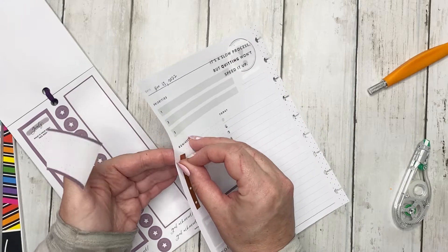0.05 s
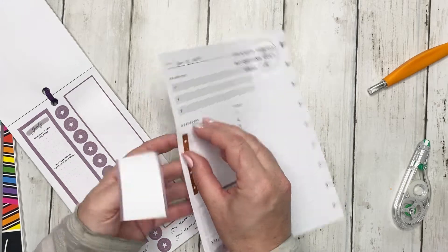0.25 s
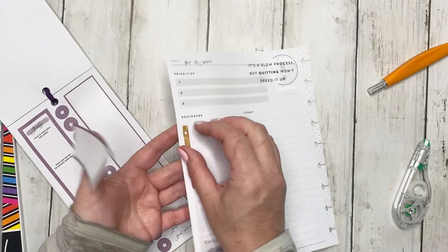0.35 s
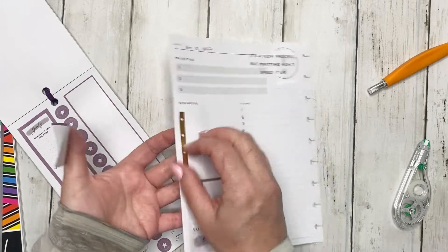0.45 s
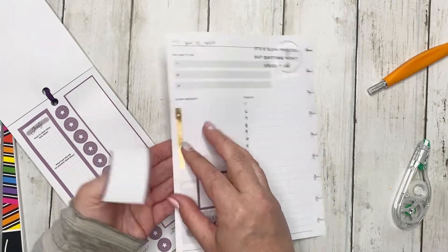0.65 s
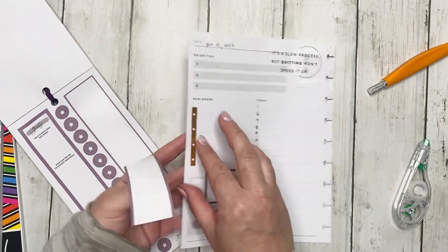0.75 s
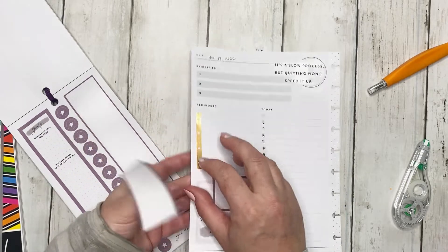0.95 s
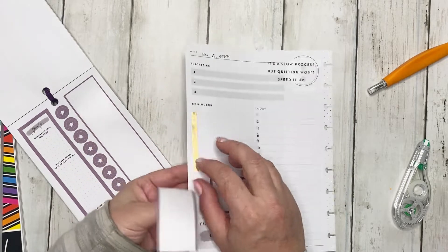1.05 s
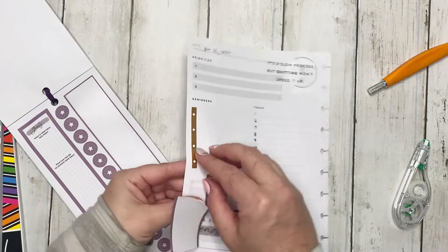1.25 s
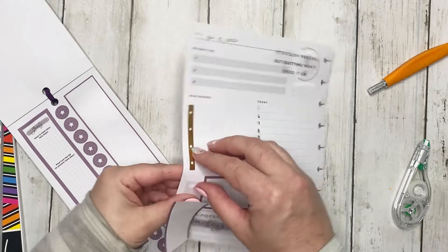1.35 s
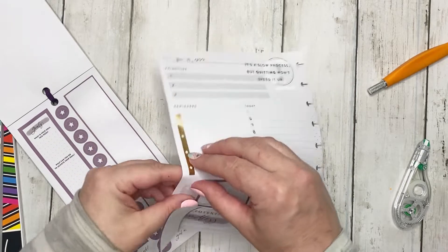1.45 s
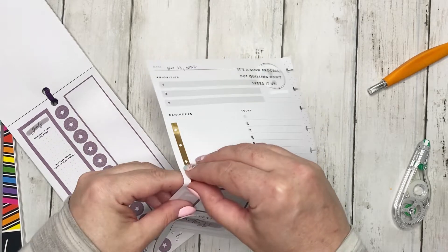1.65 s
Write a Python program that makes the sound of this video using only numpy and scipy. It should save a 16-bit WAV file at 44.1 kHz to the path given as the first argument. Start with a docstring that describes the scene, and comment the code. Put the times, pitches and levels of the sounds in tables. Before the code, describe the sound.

Paper rustling and popping as a sheet is handled, with hollow clicks, soft hiss and crackles

```python
"""A small quiet room, close microphone: a planner page is slid and lifted on a desk while a strip
of sticker is pressed along its edge. Shaped noise makes the page's hiss, scrape and rustle, and
bands of noise, some gliding, make the fingertip rubs and swishes. Short bursts of tone make the soft
hollow pops of the buckling sheet and some of their close echoes; fading tones colour them.
Short bursts of bright noise make crackles as the adhesive lets go, and sharpen one loud pop."""
import sys
import numpy as np
from scipy import signal
from scipy.fft import rfft, irfft
from scipy.io import wavfile
from scipy.ndimage import uniform_filter1d

SR = 44100
rng = np.random.default_rng(int(sys.argv[2]) if len(sys.argv) > 2 else 0)


def generate_wav(sig):
    """Save sig (samples, or channels by samples) to the path in sys.argv[1] as 16-bit PCM at SR."""
    pcm = np.round(np.clip(np.atleast_2d(sig).T, -1, 1) * 32767).astype(np.int16)
    wavfile.write(sys.argv[1], SR, pcm)


N = 74970
TIME = np.arange(N) / SR  # seconds

# the room's quiet air, its spectrum: pitch_hz, level_db
AIR_COLOUR = [(25, -32), (80, -9), (125, 18), (165, -15.5), (215, 4.5), (280, 10.5), (400, -13.5),
              (1000, -33), (1700, -21), (6000, -26), (13000, -49)]
AIR_DB = -64

# the sliding page's high hiss, loudness over time: time_s, level_db
HISS_LEVEL = [(0, -80), (.05, -83), (.09, -53.5), (.15, -83), (.185, -62.5), (.22, -45), (.26, -49),
              (.35, -59.5), (.42, -52), (.51, -60.5), (.58, -47.5), (.625, -56.5), (.67, -46.5),
              (.73, -54.5), (.80, -46), (.89, -62), (.93, -48.5), (.97, -47.5), (1.02, -69), (1.17, -65.5),
              (1.21, -45.5), (1.29, -42), (1.35, -62), (1.38, -47.5), (1.42, -66.5), (1.58, -65),
              (1.63, -76.5), (1.7, -68.5)]
# the hiss, its spectrum: pitch_hz, level_db
HISS_COLOUR = [(3000, -32), (6500, -15), (8500, -9.5), (10500, 3.5), (12000, 5.5), (13600, 2.5),
               (15000, -28)]
# the coarser scrape under the hiss, loudness over time: time_s, level_db
SCRAPE_LEVEL = [(0, -78), (.17, -71.5), (.22, -49), (.30, -48), (.36, -59.5), (.43, -62), (.455, -49.5),
                (.50, -60.5), (.57, -55), (.68, -52.5), (.745, -60.5), (.81, -54), (.86, -56), (.895, -70),
                (.94, -50), (1.01, -64.5), (1.16, -66.5), (1.20, -47.5), (1.29, -46), (1.315, -55),
                (1.39, -50), (1.43, -64), (1.7, -74.5)]
# the scrape, its spectrum: pitch_hz, level_db
SCRAPE_COLOUR = [(700, -16), (1900, -5.5), (2900, 2.5), (3550, -2.5), (4000, -2.5), (4700, -1), (5400, -2),
                 (6400, -2.5), (7600, -1), (9500, -2), (13000, -14.5)]
# the hollow rustle of the flexing sheet, loudness over time: time_s, level_db
RUSTLE_LEVEL = [(0, -67.5), (.15, -69), (.22, -51), (.26, -56), (.32, -46.5), (.41, -46), (.48, -43.5),
                (.52, -54.5), (.56, -50.5), (.61, -55.5), (.67, -55), (.75, -60.5), (.85, -63.5),
                (1.03, -67.5), (1.045, -48), (1.11, -62), (1.17, -59.5), (1.23, -50.5), (1.35, -42.5),
                (1.42, -47.5), (1.47, -49.5), (1.53, -61.5), (1.63, -65)]
# the rustle, its spectrum: pitch_hz, level_db
RUSTLE_COLOUR = [(140, -50), (230, -8.5), (420, 0), (800, 1.5), (1150, 3), (1600, -2.5), (2000, -6.5),
                 (3000, -43), (5000, -34)]
# how strongly the loudness jumps from grain to grain
HISS_ROUGH_DB, SCRAPE_ROUGH_DB, RUSTLE_ROUGH_DB, RUB_ROUGH_DB = 1.5, 2.5, 3.5, 2
GRAINS_PER_S = 280  # on average

# rubs and swishes; the one at 1.04 s is a pop's fading tail:
# start_s, length_s, level_db, attack_s, release_s, glide_octaves,
# resonances (each: pitch_hz, width_hz, level_db)
RUBS = [(.07, .07, -65.5, .035, .035, 0, [(3350, 250, 0)]), (.15, .095, -52, .065, .02, .1, [(880, 250, 0),
        (1950, 350, -5)]), (.19, .09, -52, .025, .04, -.1, [(7900, 1100, 0)]),
        (.32, .27, -56, .02, .13, .3, [(3100, 800, 0)]), (.53, .07, -50, .01, .04, 0, [(390, 90, 0)]),
        (.575, .14, -51, .075, .04, .2, [(1450, 400, 0), (2500, 900, 0), (4600, 900, -5)]),
        (.725, .05, -54, .02, .02, -.3, [(560, 100, 0)]), (.73, .14, -58, .03, .07, 0, [(1500, 300, 0)]),
        (.77, .085, -52, .035, .035, -.1, [(3300, 450, 0), (6100, 600, -4), (8800, 1200, 1)]),
        (.795, .04, -55, .015, .02, 0, [(260, 60, 0)]), (.85, .145, -57, .08, .03, .12, [(2950, 400, 0)]),
        (1.04, .07, -54, .01, .04, 0, [(1180, 120, 0), (2000, 350, -6)]),
        (1.12, .09, -50, .004, .06, .08, [(3600, 1200, -5), (5400, 900, -1), (6850, 700, 0)]),
        (1.39, .245, -55.5, .11, .12, -.04, [(7000, 400, -2), (8500, 1200, 0)])]
GRIP_SMOOTHING_SAMPLES = 64

# hollows that wander through the rubbing as the page moves, one list each: time_s, centre_hz, depth_db
HOLLOWS = [
    [(.3, 4200, 0), (.4, 4300, -13), (.56, 4450, -13), (.66, 4100, 0), (.76, 4400, -17), (1.1, 4300, -1)],
    [(.3, 8400, 0), (.36, 8200, -8), (.5, 7300, -5), (.56, 6600, -12), (.76, 5300, -12), (.93, 5100, 0)],
    [(.44, 2800, 0), (.5, 2750, -9), (.65, 2200, 0), (.8, 2100, -8), (.95, 1900, -9), (1.03, 1900, 0)],
]
HOLLOW_OCTAVES = .13  # from the centre to where the dB depth has shrunk to 37 %

# hollow pops and some of their close echoes: start_s, level_db, pitch_hz, swell_s
POPS = [(0.216, -42.5, 917, 0.0026), (.273, -22, 1174, 0.0018), (.293, -16, 935, 0.0012),
        (0.2957, -39, 1010, 0.0014), (0.3019, -27.5, 1170, 0.0021), (.3446, -30.5, 920, 0.0026),
        (0.3705, -26.5, 487, 0.0015), (.3755, -29.5, 870, 0.0017), (0.378, -29.5, 270, 0.0029),
        (.4392, -23.5, 940, 0.0019), (0.442, -24, 1250, 0.0013), (.451, -24, 990, 0.00079),
        (0.481, -38, 1070, .002), (1.038, -43, 1160, 0.0028), (1.2018, -21.5, 1235, 0.0017),
        (1.2052, -22.5, 827, 0.0028), (1.2088, -36.5, 430, 0.0022), (1.2125, -33.5, 1085, .0031),
        (1.2409, -31, 1320, 0.00067), (1.278, -31.5, 466, .008), (1.3053, -21, 950, 0.00052),
        (1.3116, -29.5, 950, 0.0011), (1.3691, -29.5, 610, 0.0021), (1.372, -22.5, 950, 0.0018),
        (1.3796, -26.5, 780, 0.0014), (1.389, -33.5, 825, .0022), (1.432, -33.5, 1030, 0.00395),
        (1.4425, -25, 893, 0.0024), (1.453, -18.5, 638, .002), (1.458, -33.5, 453, 0.0018),
        (1.463, -32, 776, .0013), (1.6901, -32.5, 914, .001)]
# short sharp snaps among the pops: start_s, level_db, pitch_hz
SNAPS = [(.273, -24, 2260), (.293, -10, 2690), (0.2981, -20.5, 1830), (.4412, -28, 1560),
         (1.2027, -18, 2120), (1.2052, -21.5, 1970), (1.2082, -18, 1800), (1.2124, -27, 1970),
         (1.241, -29.5, 2500), (1.3055, -25, 1210), (1.3693, -31.5, 3150)]
SNAP_SWELL_S = 0.0004
# the crunch of fibres during each pop, its spectrum: pitch_hz, level_db
CRUNCH_COLOUR = [(200, -87), (380, 0), (800, -4), (1450, -2), (1900, -22.5), (3000, -39), (6000, -47)]
CRUNCH_DB, CRUNCH_ROUGH_DB = -10.5, -1.0
# fading tones that colour the pops, partly like a close reflection:
# pitch_hz, level_db, fade_s (time to fall 60 dB)
FADING_TONES = [(405, -49.5, 0.13), (693.5, -55, 0.13), (818.4, -51, 0.15), (1095, -55.5, 0.16),
                (1183, -46.5, 0.077), (2196, -58, 0.36)]
FLUTTER_DB, FLUTTER_FADE_S = -7.5, 0.038  # the sheet settles after each pop
SHEET_LOW_HZ = 309  # a small sheet radiates little bass

# bright noise crackles; the one at .2931 s is the sharp edge of a loud pop: start_s, level_db, swell_s
CRACKLES = [(1.3257, -23.5, .0012), (1.338, -29, .0009), (1.3415, -32, .0006), (1.3448, -31, .0008),
            (1.3686, -35, .0006), (.2931, -29, .0005)]
# the crackles, their spectrum: pitch_hz, level_db
CRACKLE_COLOUR = [(500, -10), (1800, -21), (2300, 13), (3500, 4), (4000, -38), (5000, 8), (5900, -17),
                  (7600, 10.5), (8500, -9), (10200, 13), (11500, -2.5), (12500, -4.5), (14500, 0)]

ROOM_DB, ROOM_FADE_S = -11, 0.16
TAIL_BUILD_S, TAIL_TOP_HZ = 0.0037, 2780  # tails build up briefly and lose their treble
LOW_CUT_HZ, BASS_LEAK_DB, TOP_CUT_HZ = 202.6, -33.5, 14600  # the microphone


def from_db(db):
    """Turn decibels into a multiplier."""
    return 10 ** (np.asarray(db) / 20)


def rms_one(x):
    """Scale a sound to an average strength (rms) of 1."""
    return x / np.sqrt(np.mean(x ** 2) + 1e-20)


def level(curve):
    """Draw straight lines in dB between the points of a loudness curve."""
    return from_db(np.interp(TIME, *np.transpose(curve)))


def filtered(x, order, hz, kind="low"):
    """Keep what lies below hz, or above it if kind is "high"."""
    return signal.sosfilt(signal.butter(order, hz, kind, fs=SR, output="sos"), x)


def coloured(x, colour):
    """Give a noise the spectrum drawn by a colour table, with an rms of 1."""
    hz, db = np.transpose(colour)
    bins = np.maximum(np.fft.rfftfreq(N, 1 / SR), 1)  # at least 1 Hz, so that the log works
    gain = from_db(np.interp(np.log(bins), np.log(hz), db))
    return rms_one(irfft(rfft(x) * gain, N))


def catches(rough_db):
    """Fibres catch and slip: the strength jumps at random from grain to grain."""
    grain = np.cumsum(rng.random(N) < GRAINS_PER_S / SR)
    strength = from_db(rough_db * np.clip(rng.standard_normal(N + 1), -2, 2))
    return strength[grain]


def friction(colour, rough_db):
    """Rubbing is heard as noise whose strength jumps in grains."""
    return coloured(catches(rough_db) * rng.standard_normal(N), colour)


def swell(start, swell_s):
    """Rise roundly to 1 after swell_s, then fall quickly."""
    u = np.maximum(TIME - start, 0) / swell_s
    return (u * np.exp(1 - np.minimum(u, 50))) ** 2


def flick(start, hz, swell_s):
    """A short burst of tone, as from a patch of paper flipping over."""
    return swell(start, swell_s) * np.sin(2 * np.pi * hz * (TIME - start - swell_s))


def ring(x, hz, fade_s):
    """One tone is set ringing by x and dies away."""
    radius = np.exp(-np.log(1000) / (fade_s * SR))  # loss per sample
    turn = 2 * np.pi * hz / SR
    # the tiny offset keeps the numbers from becoming too small to compute quickly
    return signal.lfilter([0, np.sin(turn)], [1, -2 * radius * np.cos(turn), radius * radius], x + 1e-18)


def tail(x, fade_s):
    """A dull, diffuse decay: the sound is smeared by fading noise."""
    fade = np.exp(-np.log(1000) * TIME / fade_s)
    response = rng.standard_normal(N) * fade * np.minimum(TIME / TAIL_BUILD_S, 1)
    dull = filtered(x, 2, TAIL_TOP_HZ)
    return signal.fftconvolve(dull, response / np.linalg.norm(response))[:N]


def room_air():
    """The quiet air of the room is a steady shaped noise."""
    return from_db(AIR_DB) * coloured(rng.standard_normal(N), AIR_COLOUR)


def sliding_page():
    """Paper rubs on the desk with a fine hiss and a coarser scrape, and the sheet rustles hollowly."""
    hiss = level(HISS_LEVEL) * friction(HISS_COLOUR, HISS_ROUGH_DB)
    scrape = level(SCRAPE_LEVEL) * friction(SCRAPE_COLOUR, SCRAPE_ROUGH_DB)
    rustle = level(RUSTLE_LEVEL) * friction(RUSTLE_COLOUR, RUSTLE_ROUGH_DB)
    return hiss + scrape + rustle


def rubs_and_swishes():
    """Grainy bands of noise, some gliding, as from skin dragging over paper; one is a pop's tail."""
    out = np.zeros(N)
    for start, length, db, attack, release, glide, resonances in RUBS:
        bend = 2 ** (glide * np.clip((TIME - start) / length - .5, -.5, .5))
        rub = 0
        for hz, width_hz, peak_db in resonances:
            # two slow noises carried on a cosine and a sine make a band of noise around hz
            a, b = filtered(rng.standard_normal((2, N)), 2, width_hz / 2)
            phase = 2 * np.pi * hz * np.cumsum(bend) / SR
            band = rms_one(a * np.cos(phase) + b * np.sin(phase))
            rub = rub + from_db(peak_db) * band
        grip = uniform_filter1d(catches(RUB_ROUGH_DB), size=GRIP_SMOOTHING_SAMPLES)
        rise, fall = (TIME - start) / attack, (start + length - TIME) / release
        out += from_db(db) * rms_one(grip * rub) * np.clip(np.minimum(rise, fall), 0, 1)
    return out


def hollowed(x):
    """Cut wandering hollows out of a sound, one short slice of time after another."""
    hz, when, frames = signal.stft(x, SR, nperseg=512, noverlap=384)
    for track in HOLLOWS:
        time_s, centre_hz, depth_db = np.transpose(track)
        octaves = np.log2(np.maximum(hz, 1)[:, None] / np.interp(when, time_s, centre_hz))
        shape = np.exp(-(octaves / HOLLOW_OCTAVES) ** 2)
        frames = frames * from_db(np.interp(when, time_s, depth_db) * shape)
    return signal.istft(frames, SR, nperseg=512, noverlap=384)[1][:N]


def buckling_sheet():
    """Hollow pops with a crunch, some close echoes and sharp snaps; tones and a flutter fade after."""
    crunch = from_db(CRUNCH_DB) * friction(CRUNCH_COLOUR, CRUNCH_ROUGH_DB)
    pops = np.zeros(N)
    for start, db, hz, swell_s in POPS:
        pops += from_db(db) * (flick(start, hz, swell_s) + crunch * swell(start, swell_s))
    for start, db, hz in SNAPS:
        pops += from_db(db) * flick(start, hz, SNAP_SWELL_S)
    tones = sum(from_db(db) * ring(pops, hz, fade_s) for hz, db, fade_s in FADING_TONES)
    flutter = from_db(FLUTTER_DB) * tail(pops, FLUTTER_FADE_S)
    return filtered(pops + tones + flutter, 3, SHEET_LOW_HZ, "high")


def bright_crackles():
    """Short bursts of bright noise: the adhesive lets go, and one is the sharp edge of a loud pop."""
    bright_noise = coloured(rng.standard_normal(N), CRACKLE_COLOUR)
    bursts = sum(from_db(db) * swell(start, swell_s) for start, db, swell_s in CRACKLES)
    return bright_noise * bursts


def scene():
    """Mix the pops and crackles with their room sound, the air and the rubbing."""
    clicks = buckling_sheet() + bright_crackles()
    air = room_air()
    room = from_db(ROOM_DB) * tail(clicks, ROOM_FADE_S)
    rubbing = hollowed(sliding_page() + rubs_and_swishes())
    return (clicks + room + rubbing + air)[None]  # one channel


def record(dry):
    """The microphone drops nearly all the bass and cuts the top steeply."""
    thin = filtered(dry, 7, LOW_CUT_HZ, "high") + from_db(BASS_LEAK_DB) * dry
    top_cut = signal.ellip(10, .3, 75, TOP_CUT_HZ, fs=SR, output="sos")  # .3 dB ripple, 75 dB cut
    return signal.sosfilt(top_cut, thin)


dry = scene()
out = record(dry)
generate_wav(out)
```